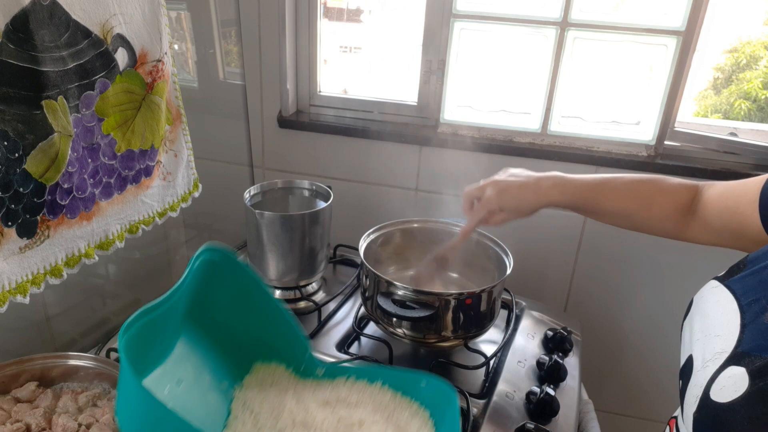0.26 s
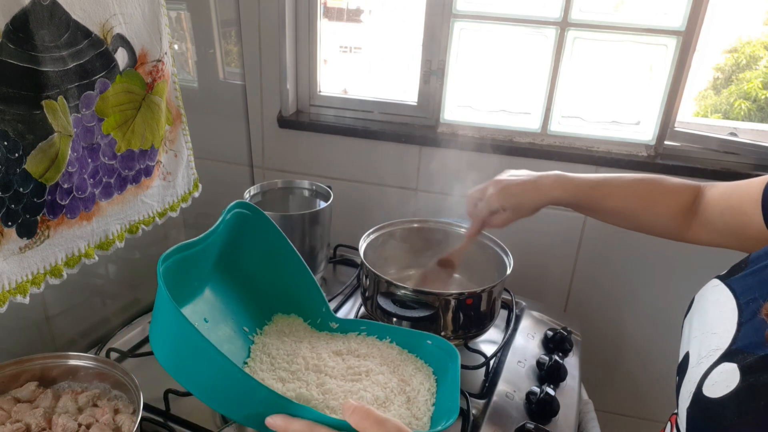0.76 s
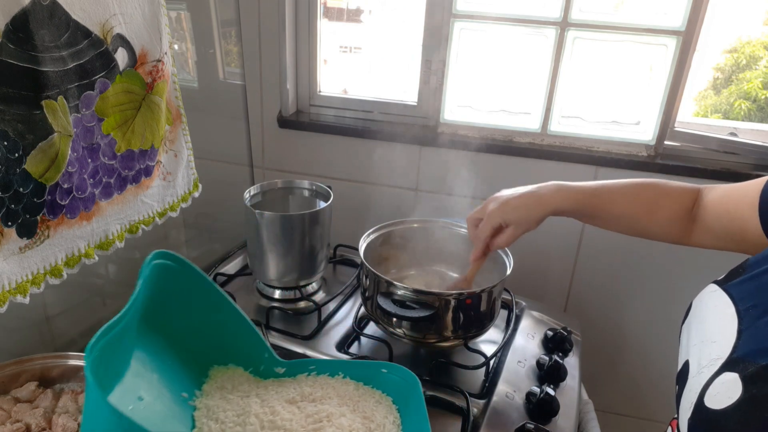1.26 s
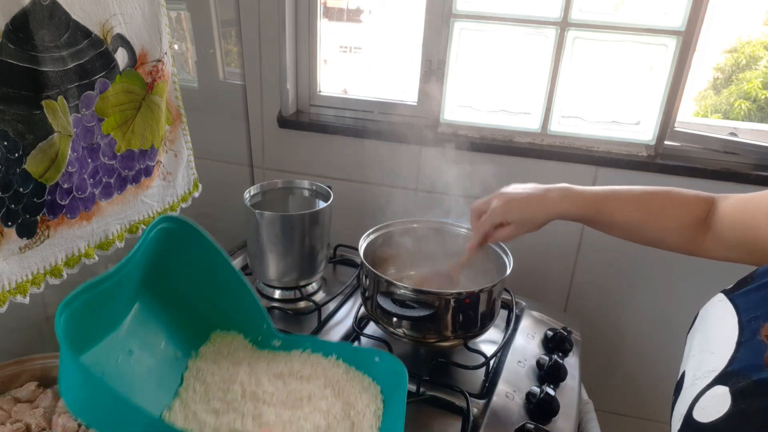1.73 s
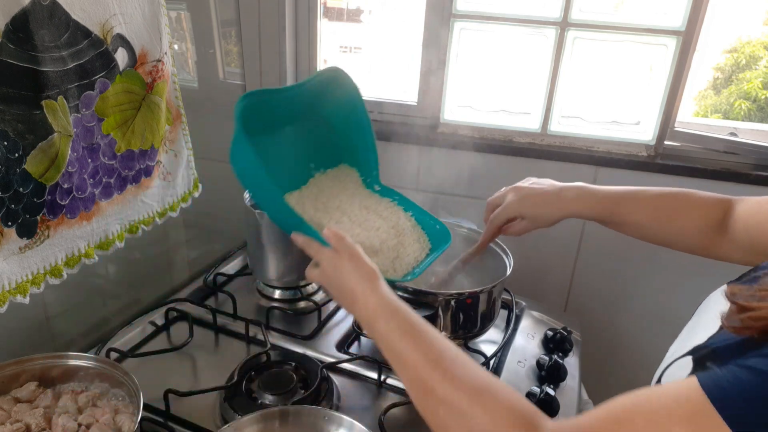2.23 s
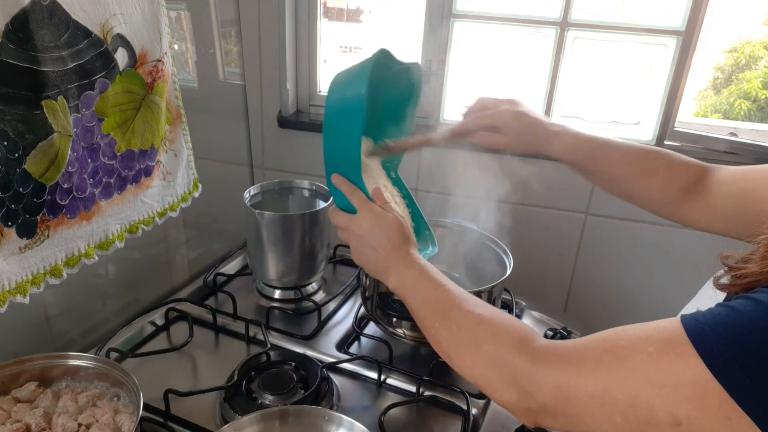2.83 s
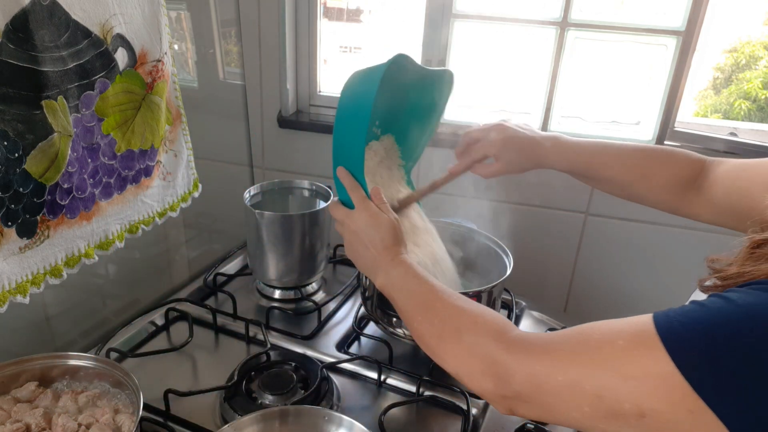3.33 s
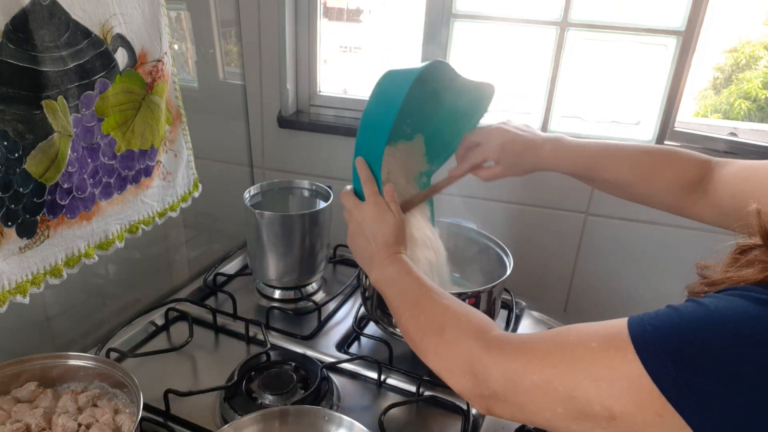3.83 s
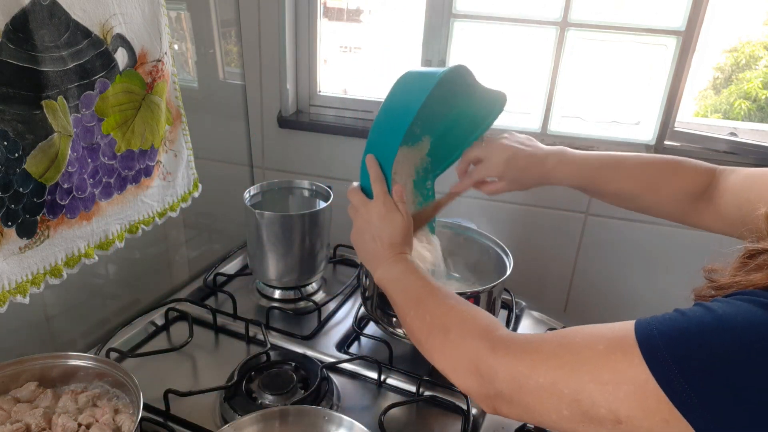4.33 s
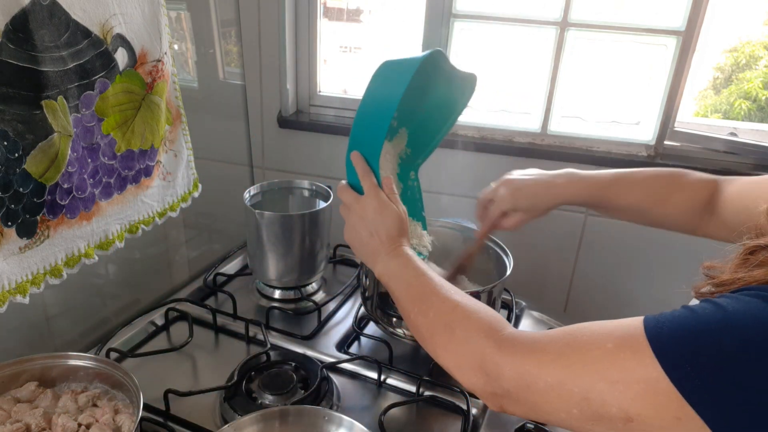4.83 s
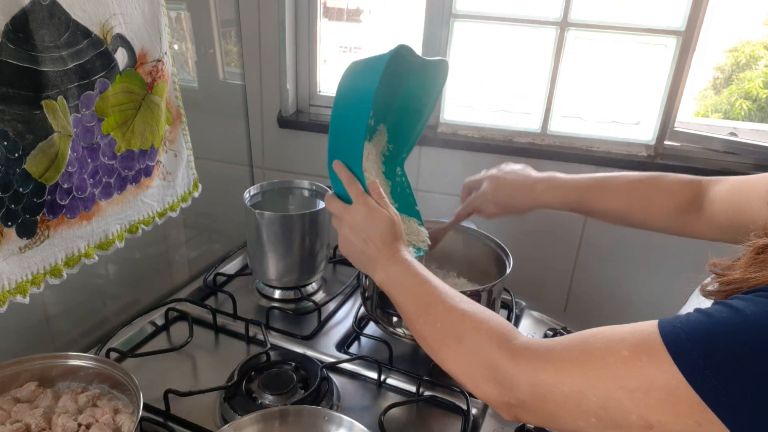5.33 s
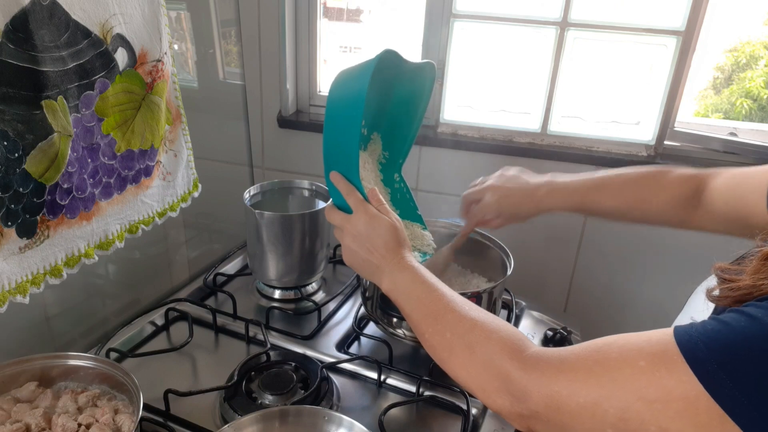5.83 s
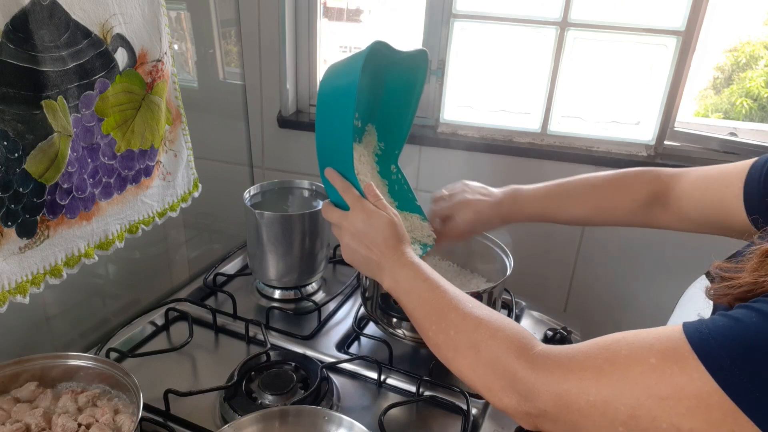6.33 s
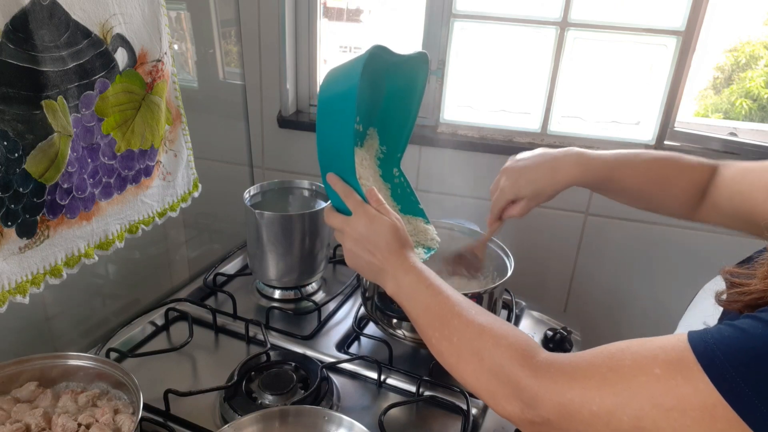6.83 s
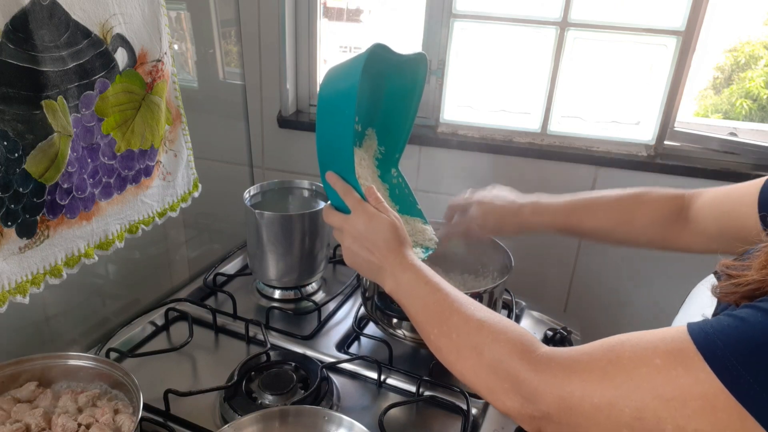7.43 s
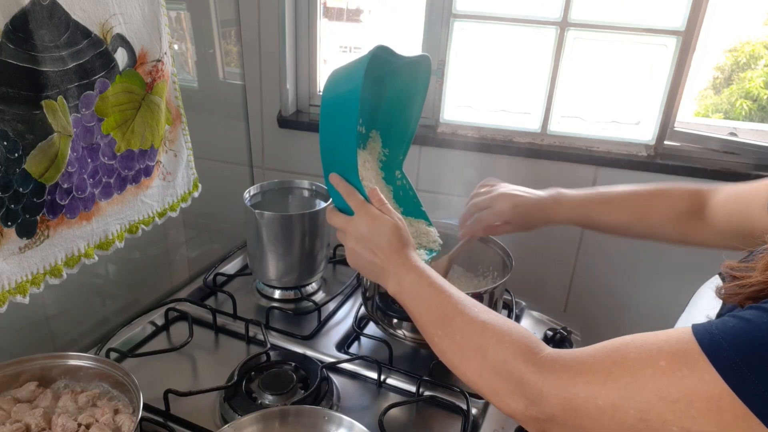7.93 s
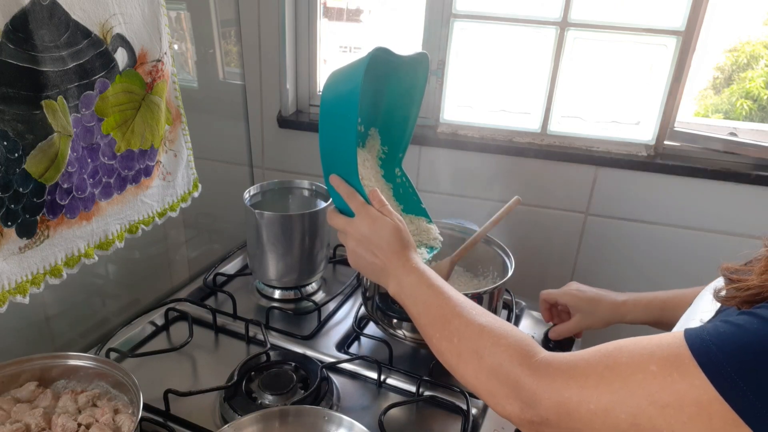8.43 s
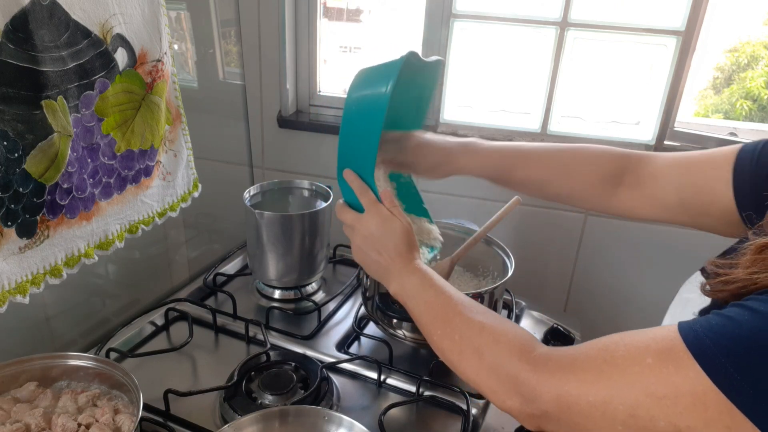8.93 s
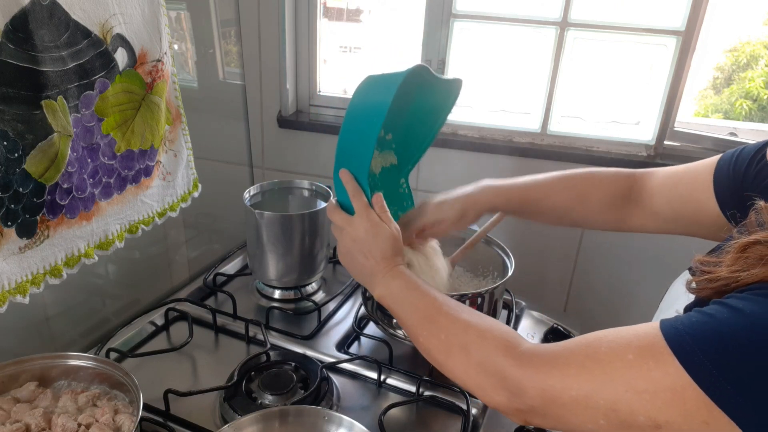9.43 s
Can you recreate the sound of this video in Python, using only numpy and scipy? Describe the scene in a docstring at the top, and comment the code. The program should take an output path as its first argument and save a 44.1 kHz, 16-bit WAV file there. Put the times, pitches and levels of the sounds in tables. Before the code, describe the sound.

From the start, a bright sizzle of fine hiss and wet fizz comes from a steel pot on a gas stove, slightly to the right, over a low, steady kitchen hum. A wooden spoon scrapes the bottom and knocks unevenly against the sides, each knock giving a short metallic ring, with a stronger cluster between 2 and 2.5 seconds. From about 3 seconds the knocks pause and the sizzle is a little softer. One sharp oil spit ticks at 4.5 seconds. At about 5 seconds, with wet rice in the pot, the sizzle leaps up and turns coarser and more crackly, strongest until 6 seconds. The spoon scrapes and knocks again, with a firm clunk at 7 seconds. Several oil spits snap between 7.4 and 8.3 seconds. The sizzle eases slightly and continues to nearly 10 seconds with a few more knocks. Tiled walls add a short tail to the knocks and spits.

```python
"""A bright sizzle comes from a steel pot on a gas stove, a little to the right, over a low kitchen hum.
Bursting bubbles make it: fine steam hiss, wet fizz and coarse crackle, coloured by the air in the pot.
A wooden spoon scrapes and knocks, ringing the pot wall and kicking up crackle. About halfway, with wet
rice in the pot, the sizzle leaps up and turns coarser, and the oil spits now and then.
Tiled walls put a short tail on the spoon and the spits."""
import sys
import numpy as np
from scipy import signal
from scipy.fft import rfft, irfft
from scipy.io import wavfile
from scipy.ndimage import uniform_filter1d

SR = 44100
rng = np.random.default_rng(int(sys.argv[2]) if len(sys.argv) > 2 else 0)


def master(y):
    """Save y as 16-bit WAV."""
    cut = np.clip(np.atleast_2d(y).T, -1, 1)
    pcm = np.round(cut * 32767)  # scale
    wavfile.write(sys.argv[1], SR, pcm.astype(np.int16))


N = 426447

# faders of the three bubble layers: (time [s], hiss [dB], fizz [dB], crackle [dB])
SIZZLE_FADERS = [(0.0, -39, -51, -58), (0.3, -40, -53, -56), (0.65, -38.5, -50, -54), (0.94, -39, -54, -60),
                 (1.1, -39, -53.5, -56.5), (1.9, -40.5, -58.5, -58.5), (2.6, -41, -62, -59.5),
                 (3.23, -42, -60, -60), (3.34, -39.5, -56.5, -59), (3.5, -41.5, -56, -61.5),
                 (4.92, -43, -59, -59), (4.95, -35, -47, -49), (5.2, -36, -46, -47),
                 (5.36, -35.5, -42, -44.5), (5.49, -36.5, -44.5, -45), (5.66, -33, -48, -48),
                 (5.93, -33.5, -49, -47), (6.36, -41, -47.5, -51.5), (6.7, -36.5, -49, -50.5),
                 (7.22, -38.5, -49.5, -52.5), (7.4, -39, -46.5, -47.5), (7.65, -38, -48, -51.5),
                 (8.16, -41, -50.5, -52), (8.46, -42, -49.5, -52), (9.45, -43, -48.5, -50),
                 (9.67, -41.5, -47, -49.5)]
# tone of the tiny steam bubbles: (frequency [Hz], gain [dB])
HISS_EQ = [(300, -42), (1000, -27), (2500, -18), (5000, -5.5), (8000, -0.5), (12000, -1.5), (16000, -1)]
# tone of the wet grains: (frequency [Hz], gain [dB])
FIZZ_EQ = [(600, -31), (2000, -17.5), (4000, -0.5), (5600, 0.5), (7500, -4.5), (11000, -10), (16000, -20)]
# tone of the large bubbles: (frequency [Hz], gain [dB])
CRACKLE_EQ = [(150, -25), (500, -15.5), (1000, -23.5), (2000, -6), (3500, 2.5), (5000, -1.5), (9000, -18),
              (16000, -33)]
# resonances of the air in the pot: (centre [Hz], width [Hz], bare bottom gain [dB], rice bed gain [dB])
AIR_MODES = [(590, 100, 20, -0.5), (654, 170, 20.5, 18), (1150, 92, 0.5, 16), (1280, 49, 13, 4),
             (1560, 270, 4, 5), (1889, 57, -9, 11), (2048, 48, 11.5, 4.5), (2254, 110, 4, 4),
             (2460, 78, 1.5, 4), (2730, 110, 5, 0), (2980, 120, -4, 4), (3440, 110, 7.5, -3.5),
             (3960, 300, 0.5, 1), (4300, 160, 1, 0.5), (5680, 780, 1.5, 1.5), (7440, 360, 1.5, -5)]
# tone of the kitchen and flame: (frequency [Hz], gain [dB])
HUM_EQ = [(24, -38), (45, -4), (62, -4), (85, 1), (130, -9), (300, -11), (600, -12), (1200, -25.5)]
# push of the spoon dragged over the bottom: (time [s], low rumble [dB], bright steel [dB])
SCRAPE_FADERS = [(0.0, -94, -86), (0.3, -97, -86.5), (0.8, -96, -84), (1.37, -101, -87), (1.96, -99, -85.5),
                 (2.4, -92.5, -90.5), (2.83, -102, -90.5), (3.39, -99, -90.5), (4.23, -103, -94),
                 (4.95, -99, -92), (5.14, -90, -87), (5.3, -95, -83), (5.66, -92.5, -83),
                 (6.19, -96, -86.5), (7.19, -93.5, -84.5), (7.65, -102, -87), (7.86, -88.5, -86),
                 (7.95, -88, -85), (8.08, -99, -86), (8.64, -105, -87.5), (9.1, -99, -89), (9.67, -98, -86)]
# spoon blows: (time [s], ping of the struck spot [dB], its pitch [Hz], grate thud [dB], clack [dB])
SPOON_BLOWS = [(0.019, -50, 619, -63, -63), (0.058, -57, 620, -75, -66), (0.142, -49.5, 610, -71, -67),
               (0.18, -51, 630, -70, -66), (0.432, -53, 549, -64, -51), (0.454, -51, 544, -68, -57),
               (0.502, -49, 586, -59, -61), (0.646, -51, 620, -67, -66), (0.665, -48, 597, -68, -64),
               (0.7, -51, 625, -72, -66), (0.755, -55, 620, -77, -68), (1.025, -58, 620, -72, -67),
               (1.546, -54, 530, -62, -57), (1.794, -45, 620, -65, -61), (1.828, -55, 616, -62, -58),
               (2.117, -44, 541, -55, -51), (2.136, -46, 283, -55, -54), (2.178, -52, 310, -59, -58),
               (2.251, -49, 619, -60.5, -61), (2.375, -38.5, 730, -55.5, -63), (2.413, -62, 215, -73, -67),
               (2.513, -55, 610, -61, -64), (2.669, -58, 614, -69, -70), (3.269, -59, 624, -92, -71),
               (4.964, -54, 377, -55, -51.5), (4.984, -45, 400, -57, -57), (5.091, -54, 598, -57, -63),
               (5.431, -59, 595, -68, -64), (5.558, -47, 616, -56, -51), (5.831, -54, 622, -79, -71),
               (5.867, -59, 296, -59, -52), (6.441, -50, 287, -68, -54), (6.519, -56, 590, -71, -59),
               (6.668, -53, 643, -60, -54.5), (6.718, -48, 387, -65, -55.5), (6.871, -50, 659, -83, -71),
               (6.995, -38, 192, -54, -57), (7.385, -54, 285, -76, -69), (7.508, -52, 585, -58, -59),
               (7.549, -48, 200, -60, -61), (7.876, -46, 283, -68, -59), (7.918, -48, 397, -55, -53),
               (7.989, -46, 207, -63, -58), (8.096, -53, 706, -68, -60), (8.88, -46, 456, -63, -61),
               (8.895, -46, 172, -67, -66), (9.334, -50, 650, -78, -69)]
# modes of the pot wall on its grate: (frequency [Hz], gain [dB], t60 [s])
WALL_MODES = [(62.4, -6, 0.16), (79.7, -2, 0.15), (122, -4.5, 0.13), (171, -3, 0.18), (208.4, -3.5, 0.13),
              (237, -3, 0.089), (283.7, -1, 0.14), (329, -2.5, 0.06), (382, -2.5, 0.14), (429.5, -9, 0.27),
              (485, -3.5, 0.081), (542, 0.5, 0.12), (580, -6, 0.095), (616, 2, 0.094), (692, -2, 0.065),
              (760, -0.5, 0.065), (820, -2.5, 0.028), (946, -1, 0.026), (1155, -13, 0.035),
              (1284, -6, 0.042), (1380, -8.5, 0.04), (1487, -2, 0.026), (1778, -8.5, 0.035),
              (2035, -8.5, 0.043), (2060, -2.5, 0.068), (2507, -12, 0.079)]
# single loud spits of oil: (time [s], level [dB], pitch [Hz], left minus right [dB])
OIL_SPITS = [(4.5032, -22, 12200, -8), (7.418, -25.5, 5070, -4), (7.4404, -38, 5660, -12),
             (7.7874, -33, 3640, -8), (7.7974, -27, 7170, -4), (8.1044, -29, 6400, -5.0),
             (8.1118, -24, 6610, -3), (8.242, -33, 4980, -5.0)]
# how alike left and right are: (frequency [Hz], correlation [0-1])
STEREO_LIKENESS = [(60, 0.87), (290, 0.16), (640, 0.38), (1400, 0), (3100, 0.28), (7000, .0)]
# each microphone's colour, with a notch from its housing: (frequency [Hz], left [dB], right [dB])
MIC_EQ = [(58.3, -7, -3.5), (340, 1, 3.5), (603, -2, 3.5), (1240, 5.5, 8.5), (2090, 3, 6.5), (4500, 2, 6),
          (7910, -1.5, 4), (8540, -4.5, -5), (9950, -2.5, 1), (11430, 1, 7), (15800, -2, 5.5)]

HZ = np.maximum(np.fft.rfftfreq(N, 1 / SR), 1)
SEETHE_DB = 1.35  # slow wander of the fizz and crackle
HUM_DB = -70
BRIGHT_HZ, CLACK_HZ = 1000, 800  # modes above these take the bright scrape and the full clack
CONTACT_MS, RATTLE_S = 0.92, 0.061  # softness of the wood; fade of the bounces after a blow
SPOT_OCTAVES = 0.17  # width of a blow's ping
SPLASH_DB, SPLASH_S = 2.5, 0.022  # crackle after a blow: level against its clack, fade
DAMP_FROM_S, DAMP_T60_SHARE = 4.4, 0.95  # the wall rings slightly shorter from just before the leap
KITCHEN_T60_S, KITCHEN_DB = .35, -9
LEFT_LATE_US, TOP_HZ = 33, 15720  # the pot is nearer the right microphone; high cut


def undb(db):
    """Decibels to gain."""
    return 10 ** (np.asarray(db) / 20)


def unit(x):
    """Scale to an RMS of 1."""
    return x / np.sqrt(np.mean(x ** 2))


def fader(table, column):
    """A table column along time."""
    rows = np.array(table, float)
    return np.interp(np.arange(N) / SR, rows[:, 0], rows[:, column])


def along_hz(table, column=1):
    """A table column along log frequency."""
    rows = np.array(table, float)
    return np.interp(np.log(HZ), np.log(rows[:, 0]), rows[:, column])


def wander(per_s):
    """Smooth random drift with an RMS of 1."""
    hold = int(SR / per_s)
    steps = np.repeat(rng.standard_normal(N // hold + 1), hold)
    return unit(uniform_filter1d(uniform_filter1d(steps, hold), hold)[:N])


def wide_noise(envelope, colour):
    """Shaped stereo noise, near mono in the bass and wide above."""
    mid, side = rfft(envelope * rng.standard_normal((2, N))) * colour
    alike = np.clip(along_hz(STEREO_LIKENESS), 0, .99)
    mid, side = mid * np.sqrt(1 + alike), side * np.sqrt(1 - alike)
    return unit(irfft(np.array([mid + side, mid - side]), N))


def pot_air(column):
    """The air in the pot acts as a bank of peaks and dips; returns gain along frequency."""
    return 1 + sum((undb(row[column]) - 1) / (1 + (2 * (HZ - row[0]) / row[1]) ** 2) for row in AIR_MODES)


def bubbles(eq, air, per_s, spread_db, tail_ms, flutter_db, flutter_hz):
    """Bursting bubbles: a few big, most small, each dying fast over a fluttering bed of noise."""
    size_db = np.minimum(spread_db * rng.exponential(size=N), 8)
    pops = (rng.random(N) < per_s / SR) * undb(size_db)
    fade = np.exp(-1000 / (tail_ms * SR))
    envelope = np.sqrt(1 + signal.lfilter([1], [1, -fade], pops ** 2))
    return wide_noise(envelope * undb(flutter_db * wander(flutter_hz)), air * undb(along_hz(eq)))


def sizzle():
    """Steam hisses off the bare bottom; wet grains fizz and large bubbles crackle with a rice-bed tone."""
    bare, bed = pot_air(column=2), pot_air(column=3)
    hiss = bubbles(HISS_EQ, bare, per_s=300, spread_db=1, tail_ms=.32, flutter_db=.5, flutter_hz=24)
    fizz = bubbles(FIZZ_EQ, bed, per_s=230, spread_db=.5, tail_ms=.38, flutter_db=.48, flutter_hz=22)
    crackle = bubbles(CRACKLE_EQ, bed, per_s=180, spread_db=3, tail_ms=.92, flutter_db=.5, flutter_hz=20)
    hiss_gain = undb(fader(SIZZLE_FADERS, 1) + 0.18 * wander(7))
    fizz_gain = undb(fader(SIZZLE_FADERS, 2) + SEETHE_DB * wander(8))
    crackle_gain = undb(fader(SIZZLE_FADERS, 3) + SEETHE_DB * wander(8))
    return hiss * hiss_gain + fizz * fizz_gain + crackle * np.hypot(crackle_gain, splash())


def hum():
    """Kitchen and gas flame lay a low, gently wavering bed of noise."""
    return wide_noise(undb(0.5 * wander(2.7)), undb(along_hz(HUM_EQ))) * undb(HUM_DB)


def scrape():
    """Wood sticks and slips on steel about 3000 times a second: forces for the low and bright modes."""
    judder = undb(2 * wander(25))
    slips = unit((rng.random(N) < 3000 / SR) * judder)
    rumble = slips * undb(fader(SCRAPE_FADERS, 1) + 1.1 * wander(5))
    bright = slips * undb(fader(SCRAPE_FADERS, 2) + 0.53 * wander(6))
    return rumble, bright


def wall_ring(force, hz, t60):
    """One wall mode: wood is soft, so the ring swells in; it dies a touch faster after DAMP_FROM_S."""
    turn, split = np.exp(2j * np.pi * hz / SR), int(DAMP_FROM_S * SR)
    soft = np.exp(-1000 / (CONTACT_MS * SR))
    push = signal.lfilter([1 - soft], [1, -soft * turn], force)
    free_pole = turn * undb(-60 / (t60 * SR))
    damped_pole = turn * undb(-60 / (DAMP_T60_SHARE * t60 * SR))
    free, state = signal.lfilter([1], [1, -free_pole], push[:split], zi=[0j])
    damped, _ = signal.lfilter([1], [1, -damped_pole], push[split:], zi=state)
    return np.r_[free, damped].imag


def spoon():
    """Scraping and rattling blows ring the pot wall; each blow favours the modes near its pitch."""
    out = np.zeros(N)
    rumble, bright = scrape()
    time = np.arange(SR // 4) / SR
    bounces = rng.random((len(SPOON_BLOWS), len(time))) < 400 / SR
    rattles = bounces * np.exp(-time / RATTLE_S)
    for hz, mode_db, t60 in WALL_MODES:
        # every contact lands elsewhere, so it pushes each mode its own way
        force = (rumble if hz < BRIGHT_HZ else bright) * rng.standard_normal(N)
        for rattle, (start_s, ping_db, spot_hz, thud_db, clack_db) in zip(rattles, SPOON_BLOWS):
            ping = undb(ping_db - 23 * (np.log2(hz / spot_hz) / SPOT_OCTAVES) ** 2)
            thud = undb(thud_db - 4.4 * (np.log2(hz / 236) / 1.18) ** 2)  # broad hump at 236 Hz
            clack = undb(clack_db - 7.1 * (hz < CLACK_HZ))
            # the spot rings almost clean; the grate and the whole wall go on rattling
            blow = (.12 * ping + 0.39 * (thud + clack)) * rattle
            blow[0] = ping + thud + clack
            polarity = np.sign(rng.standard_normal(len(time)))
            at = int(start_s * SR)
            force[at:at + len(time)] += (blow * polarity)[:N - at]
        out += undb(mode_db) * wall_ring(force, hz, t60)
    return out


def splash():
    """Each spoon blow throws up a quick burst of crackle; returns its gain envelope."""
    jolts = np.zeros(N)
    for start_s, *_, clack_db in SPOON_BLOWS:
        jolts[int(start_s * SR)] = undb(clack_db + SPLASH_DB)
    return signal.lfilter([1], [1, -np.exp(-1 / (SPLASH_S * SR))], jolts)


def kitchen_reverb(sound):
    """Tiled walls add a short, wide tail after 4 ms of pre-delay."""
    time = np.arange(N) / SR
    decay = undb(-60 * time / KITCHEN_T60_S) * (time > .004)
    tail = wide_noise(decay, colour=1)[:, :SR // 2] / np.sqrt(N)
    return sound + undb(KITCHEN_DB) * signal.fftconvolve(sound, tail, axes=1)[:, :N]


def oil_spits():
    """Hot oil spits in sharp ticks, each a sine that dies within a few cycles."""
    out, time = np.zeros((2, N)), np.arange(400) / SR
    for start_s, db, hz, pan_db in OIL_SPITS:
        tick = np.sin(2 * np.pi * hz * time) * np.exp(-time * hz / 1.6)
        at = int(start_s * SR)
        out[:, at:at + len(time)] += undb(db + np.array([[pan_db], [-pan_db]]) / 2) * tick
    return out


def scene():
    """Hum and sizzle stay dry; spoon and spits feed the room."""
    return hum() + sizzle() + kitchen_reverb(spoon() + oil_spits())


def record(dry):
    """The microphone pair: its colour, a 32 Hz low cut, a slightly late left side and a steep high cut."""
    colour = undb([along_hz(MIC_EQ, 1), along_hz(MIC_EQ, 2)]) / (1 + (32 / HZ) ** 4)
    delay = np.exp(-2j * np.pi * HZ * np.array([[LEFT_LATE_US], [0]]) / 10 ** 6)
    heard = irfft(rfft(dry) * colour * delay, N)
    return signal.sosfilt(signal.ellip(16, .2, 75, TOP_HZ, fs=SR, output="sos"), heard)


dry = scene()
out = record(dry)
master(out)
```